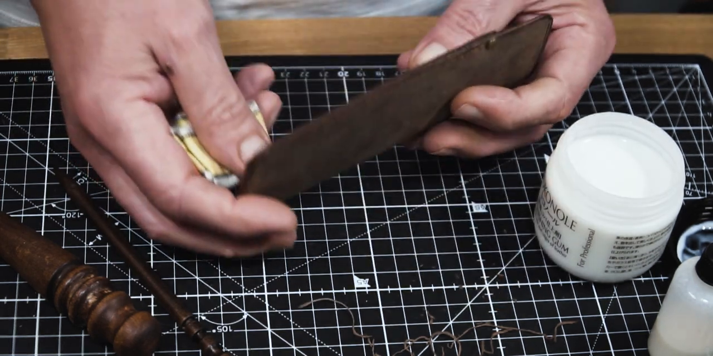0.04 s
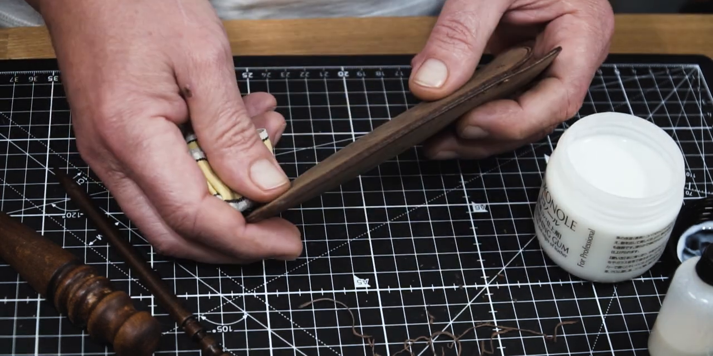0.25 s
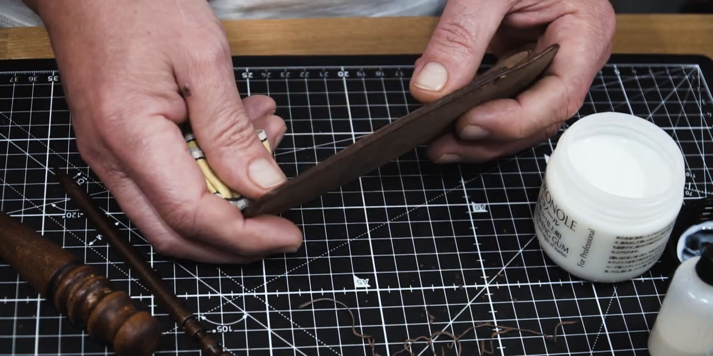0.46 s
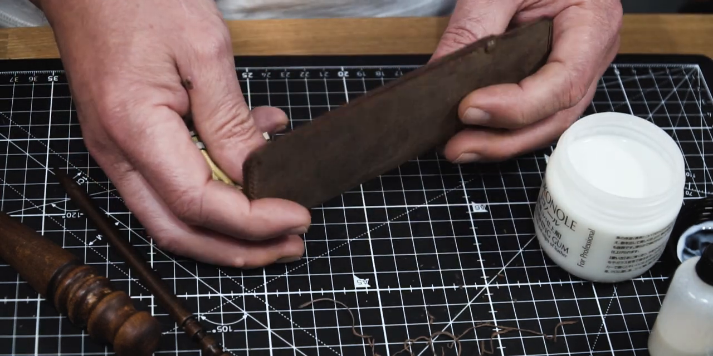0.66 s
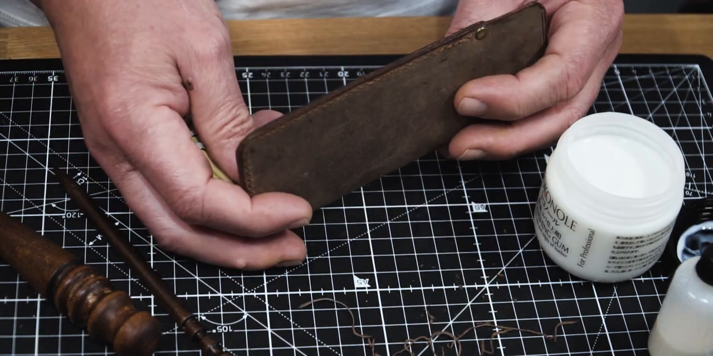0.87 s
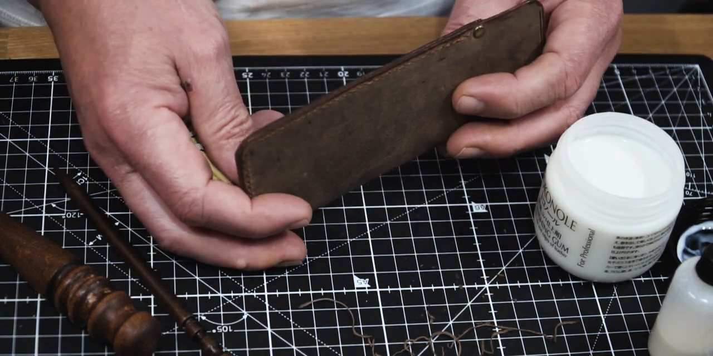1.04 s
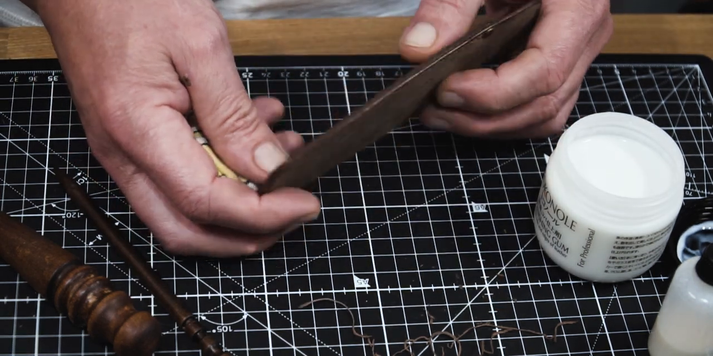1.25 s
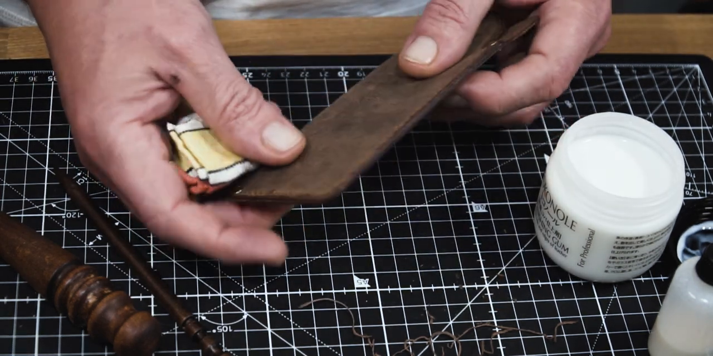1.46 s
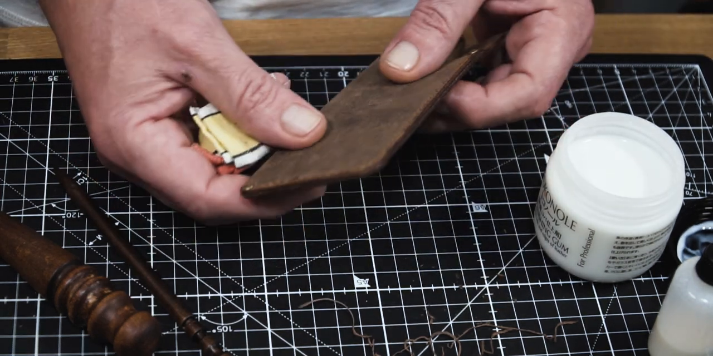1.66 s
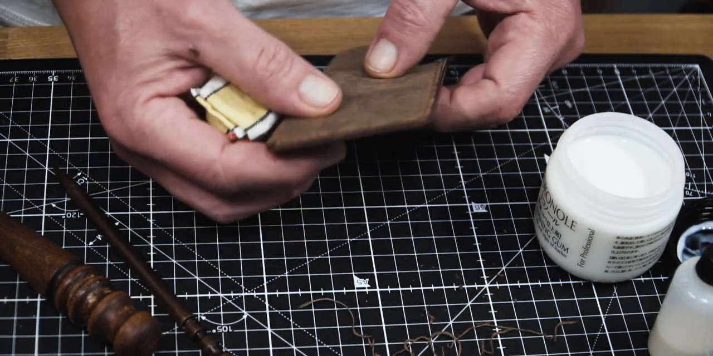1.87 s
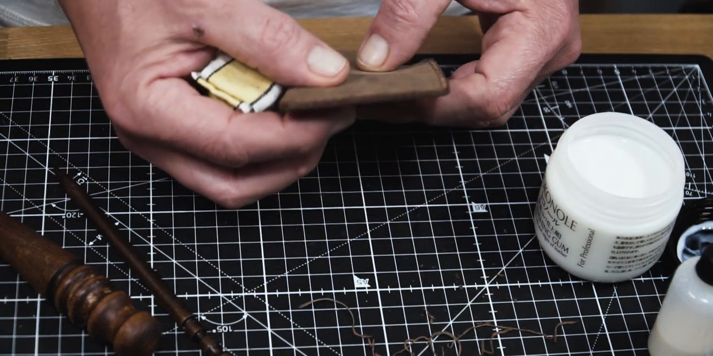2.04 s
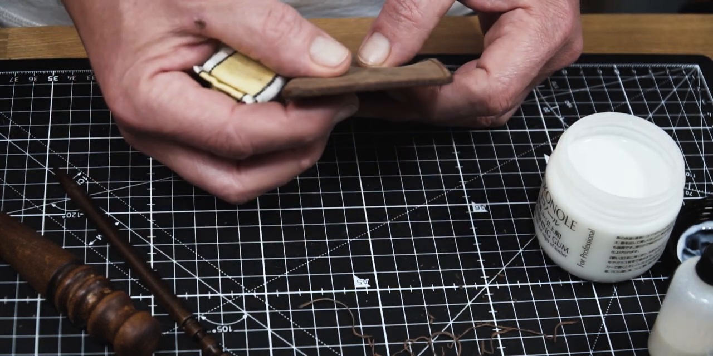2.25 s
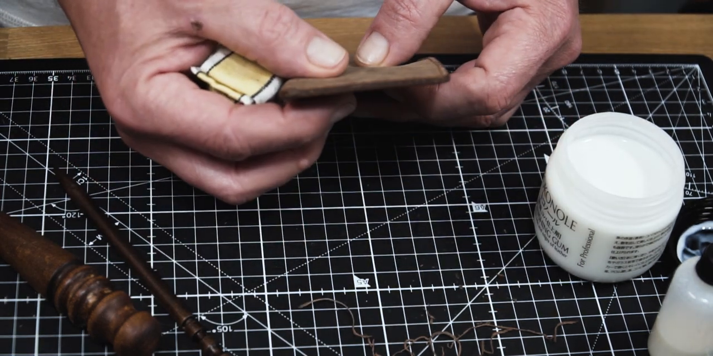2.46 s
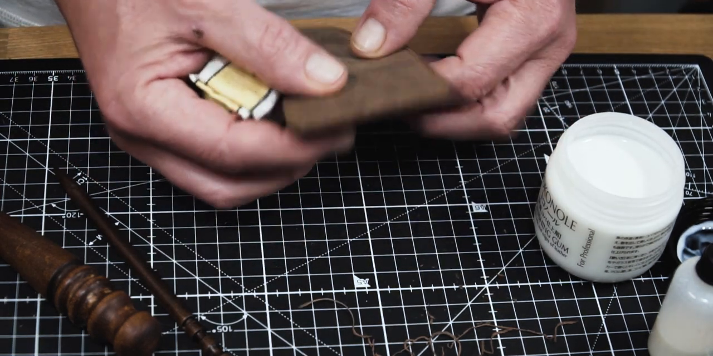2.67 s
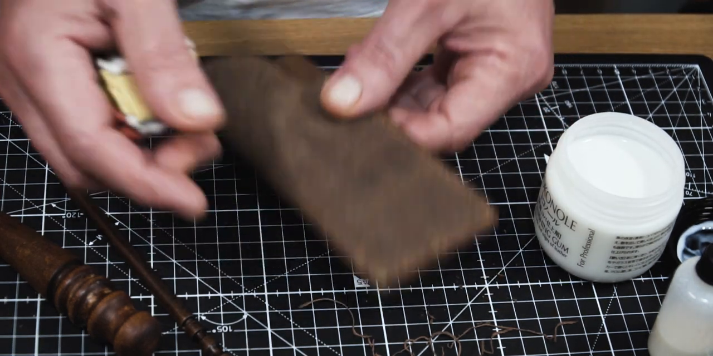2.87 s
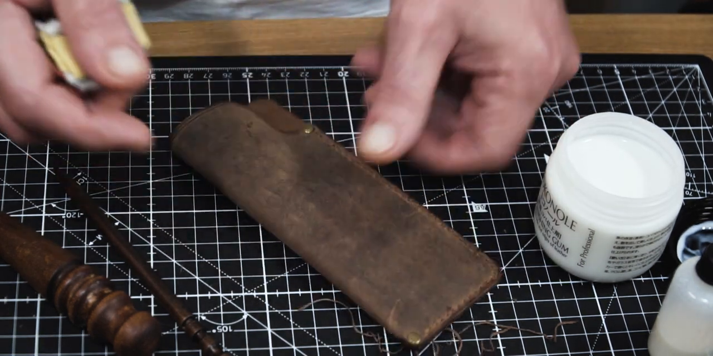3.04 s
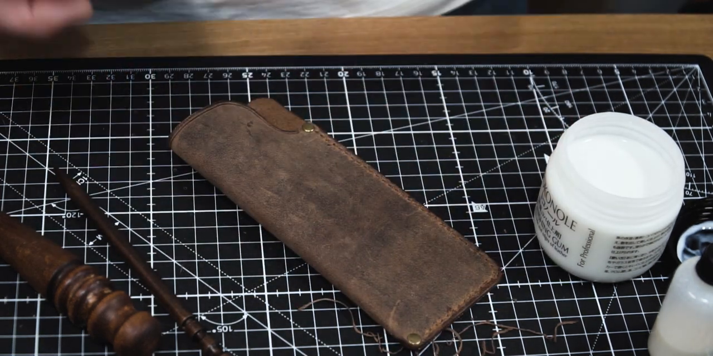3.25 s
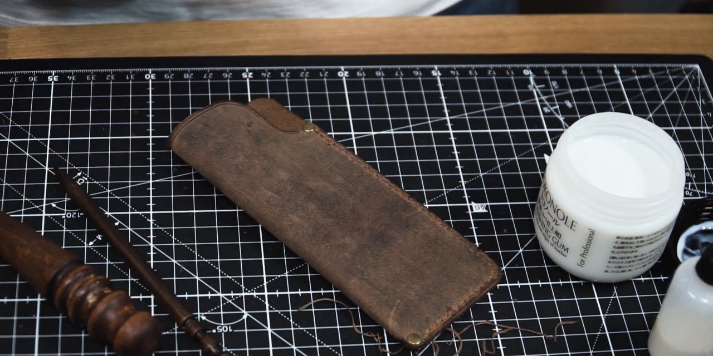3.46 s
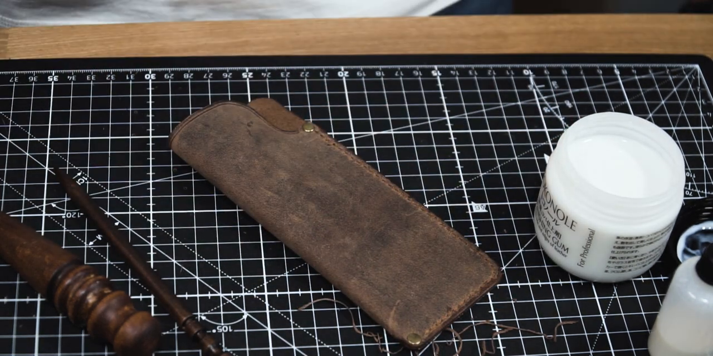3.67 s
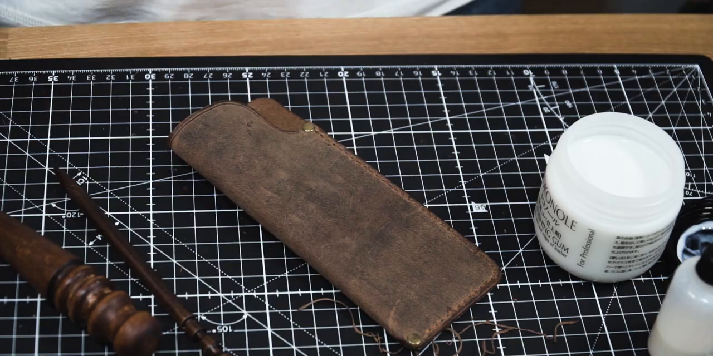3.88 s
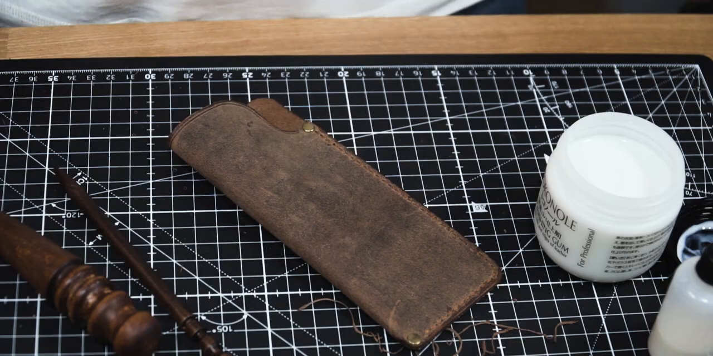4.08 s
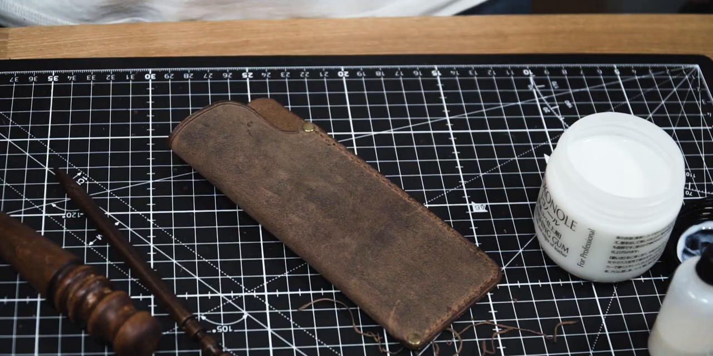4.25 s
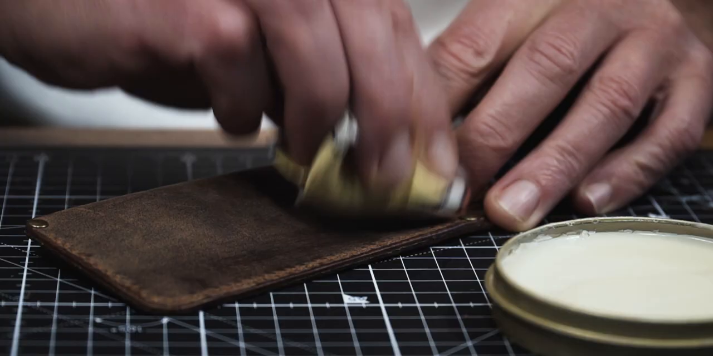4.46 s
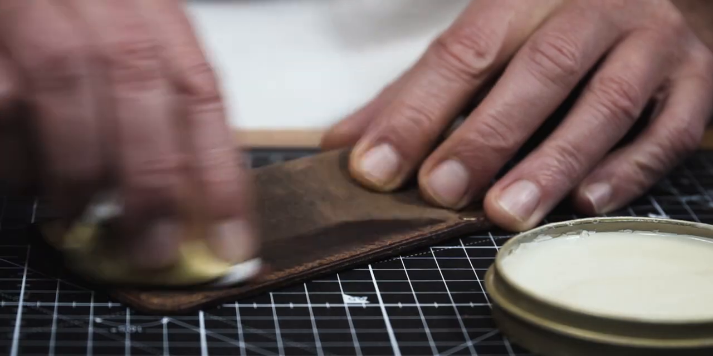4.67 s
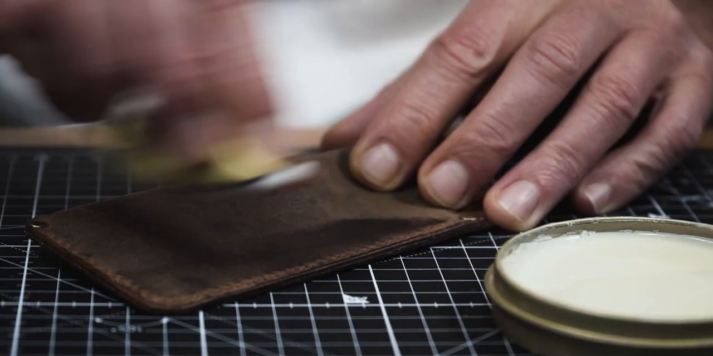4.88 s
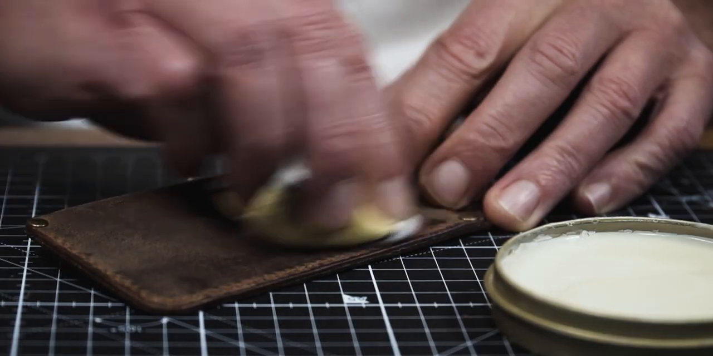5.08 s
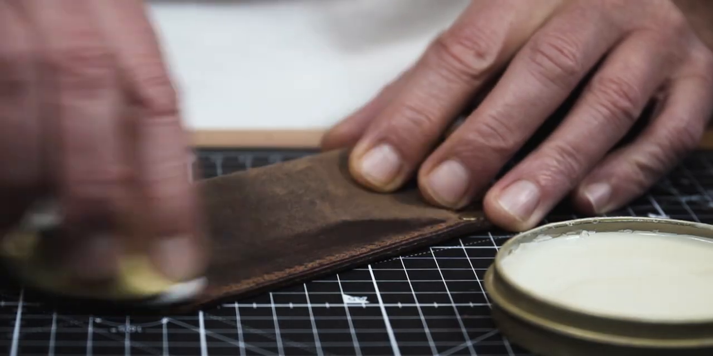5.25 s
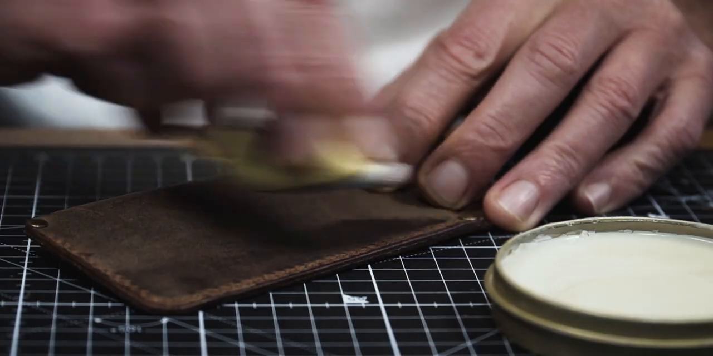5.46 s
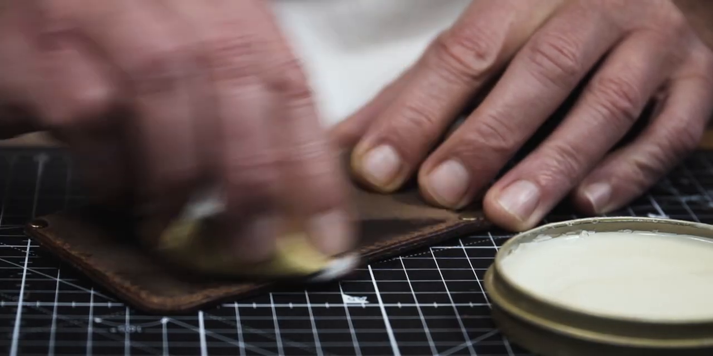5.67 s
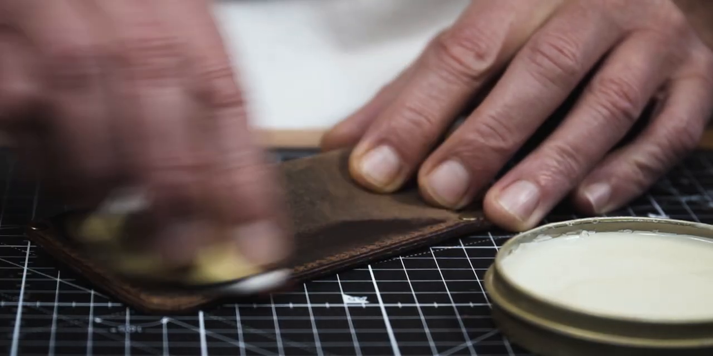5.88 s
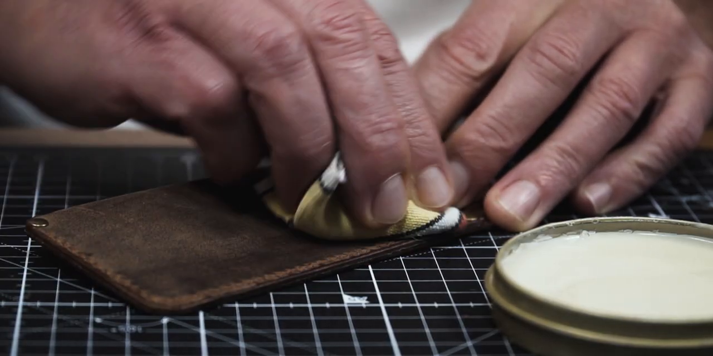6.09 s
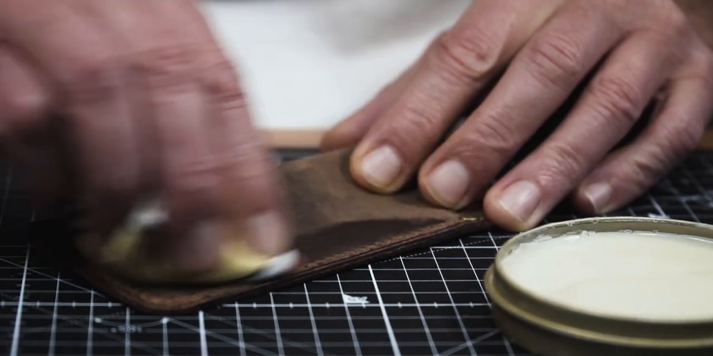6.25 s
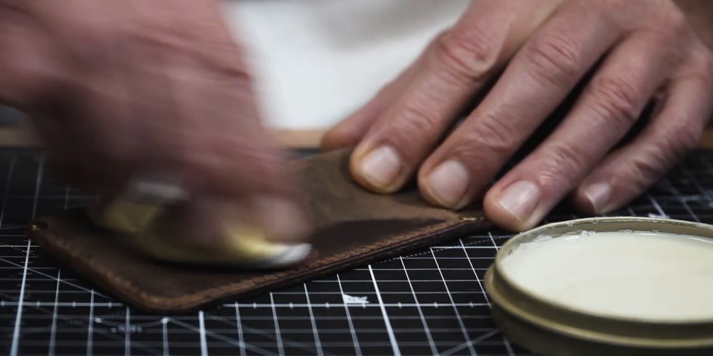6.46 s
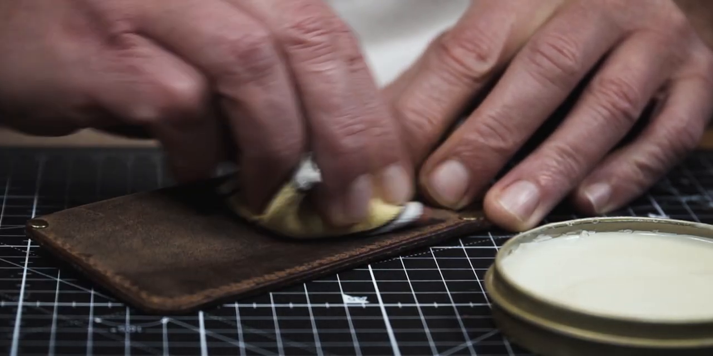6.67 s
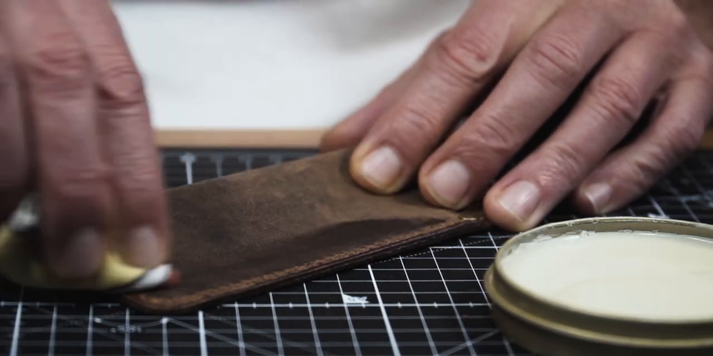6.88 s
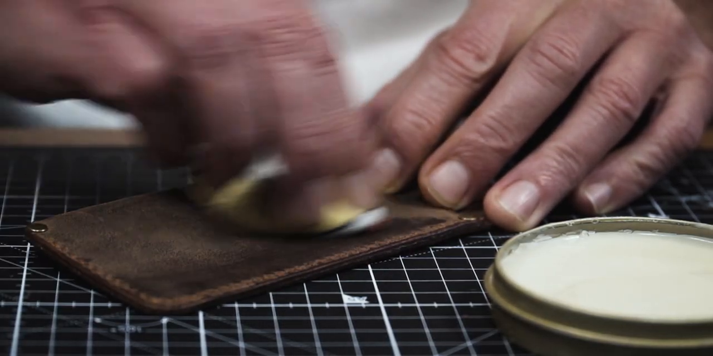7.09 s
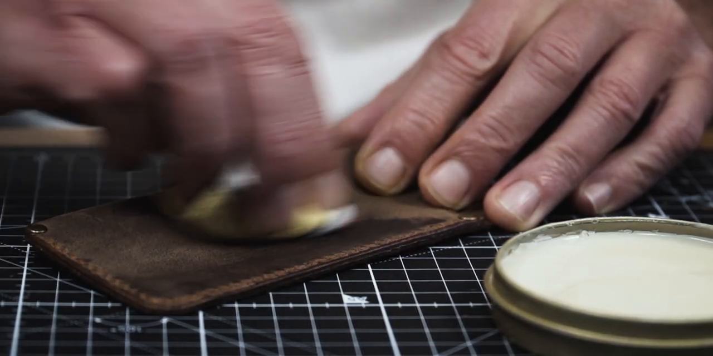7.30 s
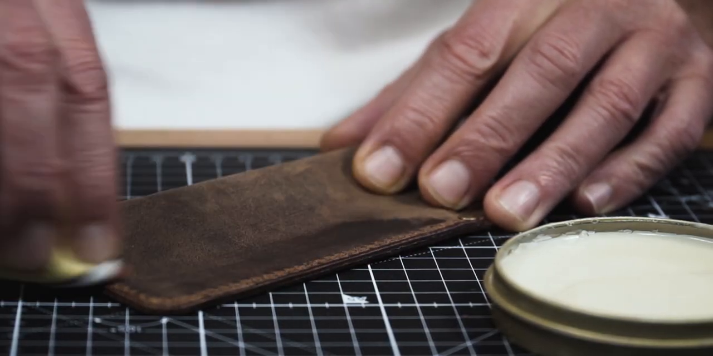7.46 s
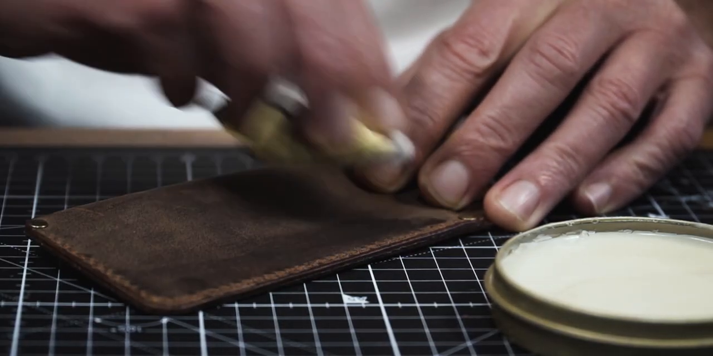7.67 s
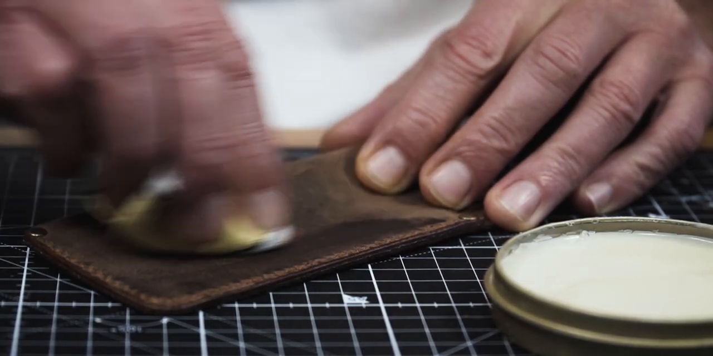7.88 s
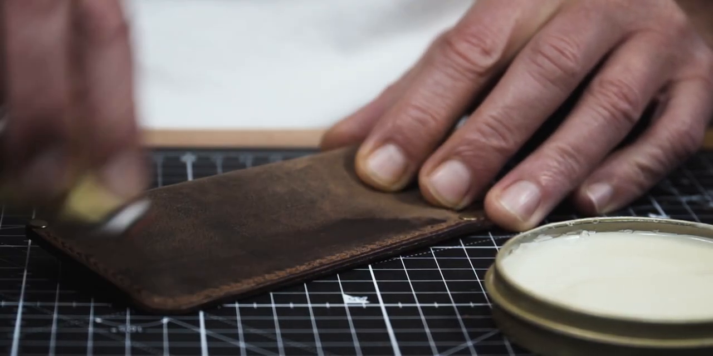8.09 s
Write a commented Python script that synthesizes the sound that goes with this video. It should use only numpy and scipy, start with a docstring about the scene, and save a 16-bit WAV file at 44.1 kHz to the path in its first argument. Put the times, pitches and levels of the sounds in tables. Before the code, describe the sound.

Close up in a small workshop, fingers and cloth slide faintly along a leather sleeve's edge with small taps. The sleeve is dropped flat on the bench mat with a sharp crack and short room echo. After a quiet gap and a swish of clothing, a cloth pad polishes the leather in quick, airy hissing strokes, with hollow taps and low bench thuds. Soft ventilation and hum lie underneath.

```python
"""A cloth pad polishes a leather sleeve in quick strokes: stick-slip noise through wandering resonances.
Each landing of the hand taps the leather, a damped air resonance, and excites the low modes of the bench.
Before this the sleeve is turned and its edge rubbed, in pitched slides of friction noise; then it is
dropped flat on a workbench mat (crack, air pocket, bench modes, echo), and clothing swishes.
The sounds are close, in a small workshop with diffuse reflections, ventilation noise and a quiet hum."""
import sys
import numpy as np
from scipy import signal
from scipy.fft import rfft, irfft, next_fast_len
from scipy.io import wavfile

SR = 44100
rng = np.random.default_rng(int(sys.argv[2]) if len(sys.argv) > 2 else 0)


def log_audio(samples):
    """Write samples as a 16-bit WAV file to the path given in sys.argv[1]."""
    # one column per channel
    frames = np.atleast_2d(samples).T
    # limit to full scale, then quantise
    limited = np.clip(frames, -1, 1)
    pcm = np.round(limited * 32767).astype(np.int16)
    wavfile.write(sys.argv[1], SR, pcm)


N = 358533  # length in samples


# dull rumbles of the leather where the hand bears down, levels before the common trim:
# (peak time [s], level [dB], tenfold rise time [s], tenfold fall time [s])
LEATHER_RUMBLES = [(4.779, -65.5, 0.43, .15), (5.28, -63.5, .5, 0.28), (5.75, -65, 0.51, 0.27),
                   (5.98, -57.5, .1, 0.08), (6.53, -55, 0.28, 0.29), (7.02, -60.5, 0.41, 0.22),
                   (7.28, -62.5, .16, 0.11), (7.53, -57, 0.1, 0.095), (8.101, -65, 0.23, 0.22)]
# relative spectrum of the rumble: (frequency [Hz], density [dB])
RUMBLE_SPECTRUM = [(220, -31), (295, 4), (360, 9), (450, 4.5), (600, -11), (900, -40), (2000, -66)]
# the lifted pad brushes back over the leather:
# (peak time [s], level [dB], tenfold rise time [s], tenfold fall time [s])
RETURN_BRUSHES = [(5.421, -72, 0.089, 0.23), (6.45, -61, 0.37, 0.23)]


def polishing(level_db=-1.86, uneven_db=0.78, drag_wander_db=-0.5, rumble_db=-1.0,
              brush_hz=1950, rocking_db=-14, rocking_hz=23):
    """Sliding friction: the pad hisses finely, and its drag makes leather rumble and bench shudder."""
    gain, drag_db, sheen_db = pad_motion()
    hiss = stroke(cloth_grain(), drag_db + drag_wander_db * drift(30), sheen_db)
    hiss = hiss * from_db(level_db + uneven_db * drift(60))
    shudder = from_db(rocking_db) * scrape(rocking_hz, width_hz=10)

    rumble_gain = sum(swell_and_fade(*row) for row in LEATHER_RUMBLES)
    rumble = rumble_gain * from_db(rumble_db) * noise(RUMBLE_SPECTRUM)
    brush_gain = sum(swell_and_fade(*row) for row in RETURN_BRUSHES)
    brush = brush_gain * scrape(brush_hz, width_hz=730)
    return gain * (hiss + shudder) + rumble + brush


# strokes of the pad, before trim and wander; sheen (at mid-stroke) and drag are relative to the hiss:
# (start time [s], length [s], level [dB], attack [s], release [s], sheen [dB],
#  drag at start [dB], drag at middle [dB], drag at end [dB])
PAD_STROKES = [ (4.563, 0.33, -45.5, 0.047, .12, -4.5, -9, -13.5, -19),
               (5.053, .05, -55, 0.028, .025, -7, -9, -8, -9),
               (5.092, .315, -44, 0.037, .085, -4, -8.5, -11, -14),
               (5.595, 0.033, -63.5, 0.0051, .02, -12.5, -0.5, 0, -4),
               (5.618, 0.27, -43.5, 0.073, 0.082, -6, -5, -13, -10.5),
               (5.9, 0.26, -42, 0.041, 0.16, -5.5, -19, -8.5, -8),
               (6.157, 0.34, -42.5, 0.075, 0.15, -4.5, -9, -15, -26),
               (6.517, 0.19, -44, 0.023, .095, -4.5, -9.5, -10.5, -7),
               (6.712, 0.3, -43, 0.074, 0.12, -3.5, -8.5, -16.5, -16),
               (6.997, 0.28, -43, 0.048, 0.094, -2, -19, -15.5, -3.5),
               (7.275, 0.33, -44, 0.047, 0.15, -1, -5.5, -16, -17),
               (7.788, 0.043, -66, .006, .02, -12, 2, 2, 0),
               (7.813, 0.32, -46, 0.054, 0.068, -2, -6, -12.5, -20)]
SHEEN_TURN_LOSS_DB = 8  # the sheen is this much weaker where the pad turns than at mid-stroke


def pad_motion():
    """Friction follows speed and pressure: strokes swell, hold and fade while drag and sheen shift."""
    t = seconds()
    gain, drag_db, sheen_db = np.zeros(N), np.zeros(N), np.zeros(N)
    for start, length, db, attack, release, top_db, *drags in PAD_STROKES:
        now = (t >= start) & (t < start + length)
        age = t[now] - start
        gain[now] += from_db(db) * eased(age / attack) * eased((length - age) / release)
        drag_db[now] = np.interp(age / length, [0, .5, 1], drags)
        sheen_db[now] = top_db - SHEEN_TURN_LOSS_DB * (1 - np.sin(np.pi * age / length))
    return gain, drag_db, sheen_db


# relative spectrum of rubbed cloth: (frequency [Hz], density [dB])
CLOTH_SPECTRUM = [(300, -33), (600, -14), (1000, -5), (1700, -8), (2100, -1.5), (2900, -0.5), (4400, 0.5),
                  (5800, -1), (7300, 2), (9100, -1.5), (9900, -6), (11800, -5.5), (15300, -8.5),
                  (16000, -10.5)]
# resonances between pad and leather: (frequency [Hz], bandwidth [Hz], mean gain [dB])
PAD_RESONANCES = [(1250, 300, -21.5), (2850, 370, -5.5), (7090, 590, -14), (11820, 950, -11.5)]


def cloth_grain(peak_wander_db=1.5):
    """Stick-slip through resonances: fine cloth friction whose spectral peaks wax and wane."""
    grain = friction(CLOTH_SPECTRUM, slips_per_s=30000, spread_db=0.1)
    out = grain
    for hz, width, db in PAD_RESONANCES:
        peak_gain = from_db(db + peak_wander_db * drift(14))
        out = out + peak_gain * resonance(grain, hz, width)
    return out


# the hand or pad meets the leather; levels are drives, before contact smoothing, filters and modes:
# (time [s], tap level [dB], tap pitch [Hz], contact time constant [s], snap level re tap [dB],
#  bench sway level [dB], low boom level [dB], upper boom level [dB])
TOUCHES = [(0.035, -67, 1510, .001, -16, -76, -47.5, -49),
           (0.179, -73, 1530, 0.00058, -16, -77, -49, -48.5),
           (1.846, -39.5, 3100, 0.000076, -16, -63, -50, -54),
           (1.8962, -26, 700, 0.00017, -13, -73, -62, -65), (2.625, -43.5, 1150, .001, -20, -82, -81, -76),
           (2.786, -37, 1020, 0.00031, -9.5, -78, -68, -83),
           (4.55, -25, 861, 0.0048, -27, -39.5, -36.5, -49),
           (5.084, -26.5, 868, 0.0022, -27, -42, -36, -43), (5.6, -23.5, 978, 0.0041, -11, -34, -34, -44),
           (6.533, -36, 900, 0.0023, -16, -28.5, -36.5, -44.5),
           (7.314, -32, 975, 0.0012, -23.5, -69, -61, -68.5),
           (7.7895, -20.5, 1036, 0.0011, -21, -40.5, -35.5, -53.5)]


def taps(t60=.012, overtone=1.65, overtone_db=-15, snap_t60=0.025, soft_hz=3800):
    """Damped air resonance: a squeezed pocket gives a short hollow tock, rounder for softer contact."""
    snap = rms_one(cut(rng.standard_normal(N), [400, 3200], "band", order=2))
    out = 0
    for s, db, hz, contact_s, snap_db, *_ in TOUCHES:
        fundamental = ring(click(s, db), hz, t60)
        upper = ring(click(s, db + overtone_db), hz * overtone, t60 / overtone)
        squeeze = 1 - np.exp(-np.clip((seconds() - s) / contact_s, 0, 20))
        snapping = from_db(db + snap_db) * snap * dying(s, snap_t60)
        out = out + squeeze * (fundamental - upper + snapping)
    return cut(out, [400, soft_hz], "band", order=2)


SLAP_S = 3.0116  # the sleeve lands flat [s]
# modes of the bench top under the slap: (frequency [Hz], level [dB], 60 dB decay time [s])
SLAP_MODES = [(154.1, -39, 0.64), (235.4, -30.5, 0.13), (335, -32, 0.055), (450, -26.5, 0.07),
              (618, -29.5, 0.15), (2000, -17.5, 0.017)]
# relative spectrum of the crack: (frequency [Hz], density [dB])
CRACK_SPECTRUM = [(150, -30), (400, -8.5), (1000, 8), (2500, -2.5), (5500, -4.5), (8000, -11),
                  (10500, -16.5), (14000, -16), (17000, -31.5)]


def slap(pocket_db=-8, pocket_hz=1030, pocket_t60=0.016, crack_db=-20, crack_t60=0.026,
         snap_db=-12, snap_t60=0.0046, rush_db=-55):
    """Impact and escaping air: air rushes out, the sleeve cracks, trapped air pops, the bench top rings."""
    blow, age = click(SLAP_S, 0), seconds() - SLAP_S
    # the rush grows until the landing and stops there
    rush_gain = from_db(rush_db) * np.exp(np.minimum(age, 0) / .016) * (age < 0)
    rush = rush_gain * noise(SLAP_ECHO_SPECTRUM)

    pop = ring(click(SLAP_S, pocket_db), pocket_hz, pocket_t60)
    pocket = resonance(pop, pocket_hz, width_hz=620)
    bench_top = sum(from_db(db) * ring(blow, hz, t60) for hz, db, t60 in SLAP_MODES)
    bench_top = cut(bench_top, 145, "high")

    crack_gain = from_db(crack_db) * dying(SLAP_S, crack_t60)
    snap_gain = from_db(snap_db) * dying(SLAP_S, snap_t60)
    crack = noise(CRACK_SPECTRUM) * (crack_gain + snap_gain)
    return rush + crack - pocket - bench_top


# relative spectrum of the echo, also of the rush of air: (frequency [Hz], density [dB])
SLAP_ECHO_SPECTRUM = [(110, -34.5), (160, -6), (230, -0.5), (450, -4.5), (750, -5.5), (1030, -2),
                      (1450, -12.5), (2100, -10), (3400, -11.5), (5000, -16), (8200, -15.5), (10400, -31),
                      (16000, -43)]


def slap_echo(echo_db=-29.0, rise_s=0.0029, late_db=-22, late_t60=0.87,
              ring_hz=1090, ring_db=-52, ring_t60=0.83):
    """Reverberant decay: the room answers; a weak late tail and a ring from things on the bench linger."""
    build_up = 1 - np.exp(-np.maximum(seconds() - SLAP_S, 0) / rise_s)
    decay = dying(SLAP_S, ROOM_T60_S) + from_db(late_db) * dying(SLAP_S, late_t60)
    echo = from_db(echo_db) * noise(SLAP_ECHO_SPECTRUM) * decay
    lingering = from_db(ring_db) * scrape(ring_hz, width_hz=190) * dying(SLAP_S, ring_t60)
    return build_up * (echo + lingering)


SETTLE_S = 3.1425  # the sleeve comes to rest [s]


def settling(db=-50, t60=0.0054):
    """Brief impact: a thin tick of high noise with rapid decay as the sleeve comes to rest."""
    tick = rms_one(cut(rng.standard_normal(N), 8000, "high", order=2))
    return from_db(db) * tick * dying(SETTLE_S, t60)


# fingers and cloth slide on the edge; levels before the common trim, the last three dB re the rub:
# (peak time [s], level [dB], tenfold rise time [s], tenfold fall time [s], drag [dB], sheen [dB],
#  scrape pitch [Hz], scrape level [dB])
EDGE_SLIDES = [ (0.102, -62, .11, 0.16, -9.5, -1.5, 3720, -3), (.265, -75, .03, .06, 3, -5, 2970, -11),
               (.71, -72, .12, .09, 3.5, -6, 1054, 3), (1.22, -57.5, .07, 0.17, -8.5, -10.5, 2000, -8.5),
               (1.42, -60, .09, 0.19, -14, -11, 3200, -12), (1.535, -63.5, .04, 0.23, -10, -5, 1856, 0),
               (1.68, -70, .1, .2, -0.5, -8, 1650, -4), (1.88, -57, .11, .15, -8, -12, 4300, -8),
               (1.97, -51.5, 0.079, 0.085, -10.5, -20, 3900, -2),
               (2.09, -72.5, .05, 0.071, -4, -34, 3046, 4), (2.67, -51, .055, .055, -8, -7, 3100, -11),
               (2.755, -65.5, .1, 0.13, -4, -5, 4000, -23), (2.83, -72, .08, 0.3, -18, -12, 2000, -5),
               (3.0, -57.5, .05, 0.042, 4, -8, 2090, -2)]
# relative spectrum of the rubbed edge: (frequency [Hz], density [dB])
EDGE_SPECTRUM = [(290, -36.5), (500, 0), (868, 4.5), (1440, -4.5), (1870, -3.5), (2190, -7), (2930, -2),
                 (4150, -5.5), (5880, -7.5), (7640, -9), (10700, -26.5), (15100, -27), (16000, -25.5)]


def edge_rubbing(level_db=-1, uneven_db=0.5, scrape_cycles=3.5):
    """Stick-slip: fingers and cloth slide unevenly on the edge, each slide scraping at its own pitch."""
    gains = np.array([swell_and_fade(*row[:4]) for row in EDGE_SLIDES])
    *_, drag_db, sheen_db, scrape_hz, scrape_db = np.transpose(EDGE_SLIDES)
    # overlapping slides add in power and share the tone colour accordingly
    power = np.sum(gains ** 2, axis=0)
    shares = gains ** 2 / power
    grain = friction(EDGE_SPECTRUM, slips_per_s=6300, spread_db=-1.5)
    rub = np.sqrt(power) * stroke(grain, drag_db @ shares, sheen_db @ shares)

    scrapes = 0
    for gain, hz, db in zip(gains, scrape_hz, scrape_db):
        scrapes = scrapes + gain * from_db(db) * scrape(hz, hz / (2 * scrape_cycles))
    return (rub + scrapes) * from_db(level_db + uneven_db * drift(80))


# soft swishes of clothing between the two jobs: (peak time [s], level [dB], Gaussian half-length [s])
CLOTHING_SWISHES = [(3.78, -75.5, 0.24), (4.226, -54, 0.066)]


def clothing(drag_db=-22, sheen_db=-7):
    """Light fibre friction: airy swishes of cloth under Gaussian envelopes."""
    gain = 0
    for s, db, half in CLOTHING_SWISHES:
        gain = gain + from_db(db) * np.exp(-((seconds() - s) / half) ** 2 / 2)
    return gain * stroke(cloth_grain(), drag_db, sheen_db)


# low modes of bench and room, levels re the drive: (frequency [Hz], level [dB], 60 dB decay time [s])
SWAY_MODES = [(22.34, -1.5, 2.28), (29.3, -14, .85)]
BOOM_MODES = [(56.75, -2.5, 0.82), (66.2, -10, 0.64)]
UPPER_BOOM_MODES = [(89.7, -0.27, .68)]


def bench(slap_sway_db=-45, slap_boom_db=-31.0, slap_upper_db=-47, boom_rise_s=0.043,
          sway_rise_s=0.024, thud_db=-1.5, thud_hz=69, thud_t60=0.15):
    """Modal excitation: every push gives a short thud, and low modes of the bench swell and fade."""
    pushes = [(s, sway, boom, upper) for s, *_, sway, boom, upper in TOUCHES]
    pushes.append((SLAP_S, slap_sway_db, slap_boom_db, slap_upper_db))
    times, sways, booms, uppers = zip(*pushes)
    thud_force = sum(click(s, db + thud_db) for s, db in zip(times, booms))
    out = -cut(ring(thud_force, thud_hz, thud_t60), 120, "low", order=3)

    # where the push lands decides how strongly each family of modes is driven
    families = ((sways, SWAY_MODES, sway_rise_s), (booms, BOOM_MODES, boom_rise_s),
                (uppers, UPPER_BOOM_MODES, boom_rise_s))
    age = np.arange(2 * SR) / SR
    for levels, modes, rise in families:
        force = sum(click(s, db) for s, db in zip(times, levels))
        for hz, db, t60 in modes:
            swell = (1 - np.exp(-age / rise)) ** 2 * np.exp(-np.log(1000) * age / t60)
            response = from_db(db) * swell / swell.max() * np.sin(2 * np.pi * hz * age)
            out = out - signal.fftconvolve(force, response)[:N]
    return out


ROOM_T60_S = 0.38  # 60 dB decay time of the room [s]


def workshop(x, first_echo_s=0.011):
    """Diffuse reverberation: convolution with decaying noise, duller than the direct sound."""
    tail = cut(rng.standard_normal(N), [150, 8500], "band", order=2) * dying(first_echo_s, ROOM_T60_S)
    unit_energy_tail = tail[:SR] / np.sqrt(np.sum(tail ** 2))
    return signal.fftconvolve(x, unit_energy_tail)[:N]


# relative spectrum of the ventilation noise: (frequency [Hz], density [dB])
VENTILATION_SPECTRUM = [(12, -19), (22, 3.5), (40, -10), (90, -20), (120, -17), (230, -12.5), (420, -13),
                        (600, -25.5), (1100, -27.5), (1500, -30.5), (3600, -42.5), (6000, -42.5),
                        (16000, -48)]
# steady hum and whine of workshop appliances, mean rms levels:
# (frequency [Hz], level at first [dB], level while polishing [dB])
APPLIANCE_HUM = [(90, -78, -80), (232.5, -70, -83.5), (288.6, -74.5, -73), (549, -85.5, -94),
                 (1054, -89.5, -90), (4460, -94, -94.5), (8390, -102, -102), (8605, -102, -104)]


def room_tone(ventilation_db=-65.5, waver_db=2.0):
    """Broadband and tonal background: soft ventilation noise with hum lines wavering in level and phase."""
    later = np.interp(seconds(), [3.0, 4.3], [0, 1])
    out = from_db(ventilation_db) * noise(VENTILATION_SPECTRUM)
    for hz, first_db, last_db in APPLIANCE_HUM:
        level_db = first_db + later * (last_db - first_db) + waver_db * drift(2.8)
        phase = 2 * np.pi * hz * seconds() + 0.61 * drift(2.8)
        out = out + from_db(level_db) * np.sqrt(2) * np.sin(phase)
    return out


def friction(spectrum, slips_per_s, spread_db):
    """Stick-slip: countless fibres catch and slip at random, each with a size of its own."""
    slips = rng.random(N) < slips_per_s / SR
    sizes = from_db(spread_db * np.minimum(rng.exponential(1, N), 4)) * rng.standard_normal(N)
    return coloured(slips * sizes, spectrum)


def stroke(grain, drag_db, sheen_db, drag_edge_hz=1750, sheen_edge_hz=9600):
    """Band balance of friction: pressure adds a lower drag to the hiss, a fast light touch a high sheen."""
    low, body = below(grain, drag_edge_hz), below(grain, sheen_edge_hz)
    hiss, drag, sheen = rms_one(body - low), rms_one(low), rms_one(grain - body)
    return hiss + from_db(drag_db) * drag + from_db(sheen_db) * sheen


def scrape(hz, width_hz):
    """Noise-excited resonance: a carrier modulated by slow random flutter."""
    flutter = rms_one(cut(rng.standard_normal(N), width_hz / 2, "low", order=2))
    return np.sqrt(2) * flutter * np.cos(2 * np.pi * hz * seconds())


def swell_and_fade(peak_s, db, rise_s, fall_s):
    """Exponential growth and decay: gain rises tenfold per rise time and falls tenfold per fall time."""
    age = seconds() - peak_s
    distance = np.minimum(np.maximum(-age / rise_s, age / fall_s), 10)
    return from_db(db - 20 * distance)


def eased(share):
    """Raised-cosine easing: a smooth step from 0 to 1."""
    return np.sin(np.pi / 2 * np.clip(share, 0, 1)) ** 2


def ring(x, hz, t60):
    """Damped oscillator: a unit click starts a decaying sine of initial height 1."""
    r, w = from_db(-60 / (t60 * SR)), 2 * np.pi * hz / SR
    return signal.lfilter([0, np.sin(w)], [1, -2 * r * np.cos(w), r * r], x + 1e-18)


def resonance(x, hz, width_hz):
    """Two-pole resonance: a band is passed with gain 1 at its top."""
    r = np.exp(-np.pi * width_hz / SR)
    zeros = np.array([1, 0, -1]) * (1 - r * r) / 2
    return signal.lfilter(zeros, [1, -2 * r * np.cos(2 * np.pi * hz / SR), r * r], x)


def click(s, db):
    """Impulse excitation: one sample at the given time."""
    return from_db(db) * (np.arange(N) == round(s * SR))


def dying(s, t60):
    """Exponential decay: an envelope that starts at s and loses 60 dB in t60."""
    age = seconds() - s
    return (age >= 0) * from_db(np.clip(-60 * age / t60, -200, 0))


def coloured(x, spectrum):
    """Spectral shaping: weight a steady signal by frequency, at unit rms."""
    hz, db = np.transpose(spectrum)
    size = next_fast_len(N, True)
    bins = np.maximum(np.arange(size // 2 + 1) * SR / size, 1)
    gain = from_db(np.interp(np.log(bins), np.log(hz), db))
    return rms_one(irfft(rfft(x, size) * gain, size)[:N])


def noise(spectrum):
    """Shaped Gaussian noise at unit rms."""
    return coloured(rng.standard_normal(N), spectrum)


def drift(per_s):
    """Interpolated random process: a wander of unit rms with per_s new values a second."""
    steps = rng.standard_normal(N // 8)
    return rms_one(np.interp(seconds() * per_s, np.arange(len(steps)), steps))


def cut(x, hz, kind, order=4):
    """Butterworth filtering: a flat passband with a smooth rolloff."""
    sos = signal.butter(order, np.clip(hz, 10, .48 * SR), kind, fs=SR, output="sos")
    return signal.sosfilt(sos, x + 1e-18)


def below(x, hz):
    """Zero-phase low-pass: the part under a frequency, so that the remainder is the part above."""
    return signal.sosfiltfilt(signal.butter(4, hz, fs=SR, output="sos"), x)


def from_db(db):
    """Logarithmic level: decibels to amplitude gain."""
    return np.exp(np.asarray(db) * (np.log(10) / 20))


def rms_one(x):
    """Power normalisation: scale to unit rms."""
    return x / np.sqrt(np.mean(x ** 2) + 1e-20)


def seconds():
    """Uniform sampling: the time of every sample."""
    return np.arange(N) / SR


def scene(rub_room_db=-17, tap_room_db=-13, hiss_db=-98):
    """Superposition: all sources add, alike in both ears, over faint independent electronic hiss."""
    rubbing = polishing() + edge_rubbing() + clothing()
    tapping = taps()
    reflections = workshop(from_db(rub_room_db) * rubbing + from_db(tap_room_db) * tapping)
    landing = slap() + slap_echo() + settling()
    mono = rubbing + tapping + landing + bench() + reflections + room_tone()
    return mono + from_db(hiss_db) * rng.standard_normal((2, N))


def record(dry, cutoff_hz=15900):
    """Soft saturation and band limiting: high peaks are rounded and the top is cut steeply."""
    rounded = .5 * np.tanh(dry / .5)
    return signal.sosfilt(signal.ellip(10, .1, 70, cutoff_hz, fs=SR, output="sos"), rounded)


dry = scene()
out = record(dry)
log_audio(out)
```